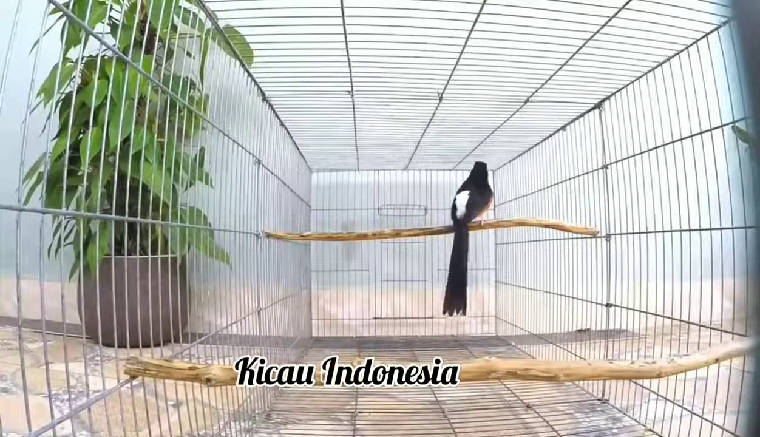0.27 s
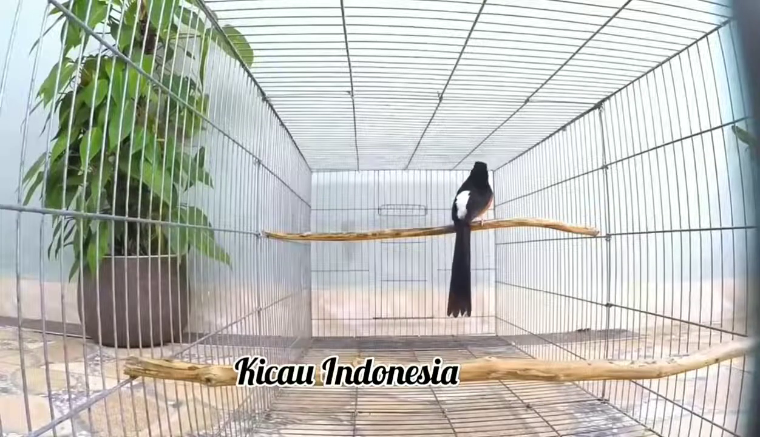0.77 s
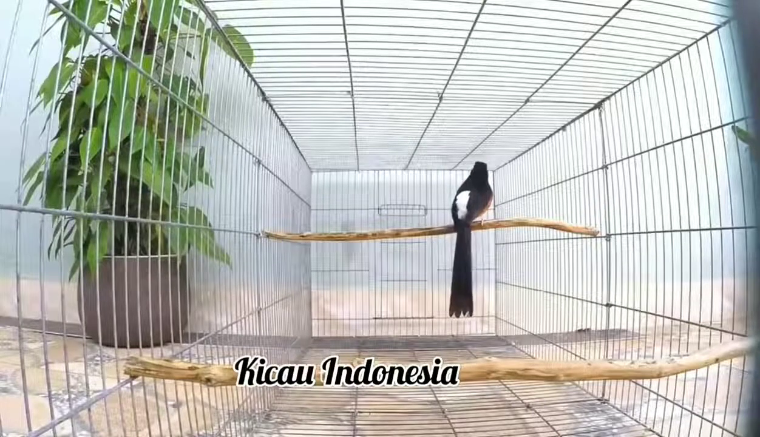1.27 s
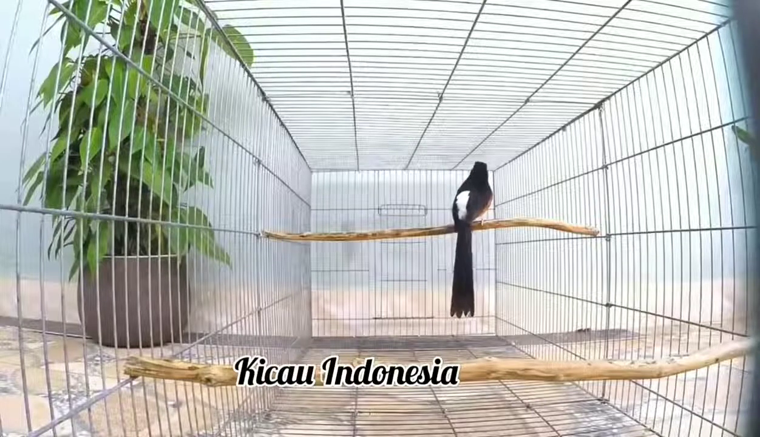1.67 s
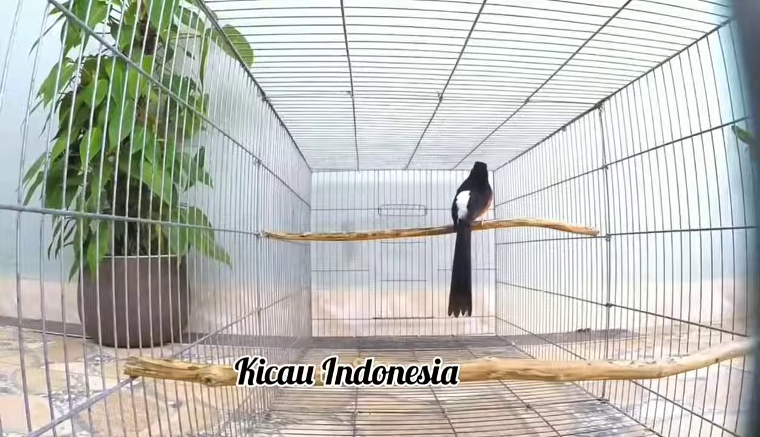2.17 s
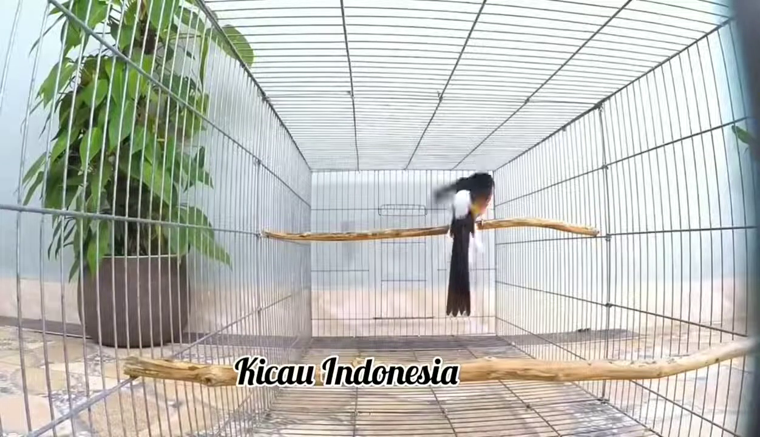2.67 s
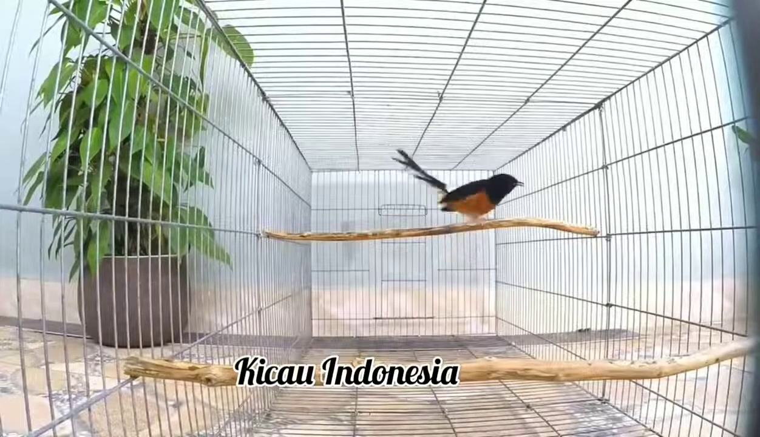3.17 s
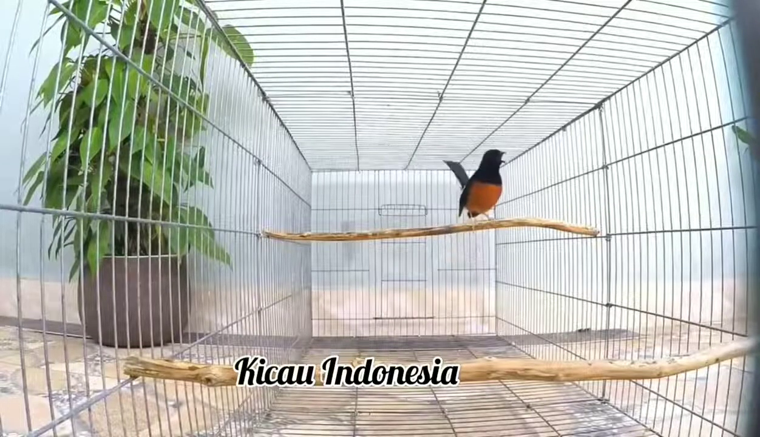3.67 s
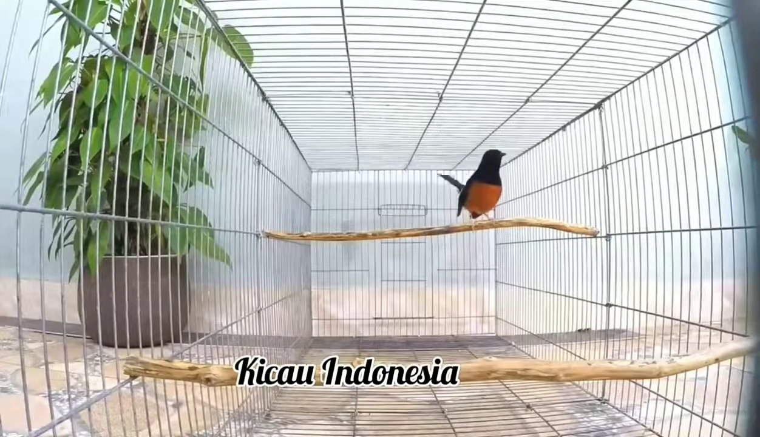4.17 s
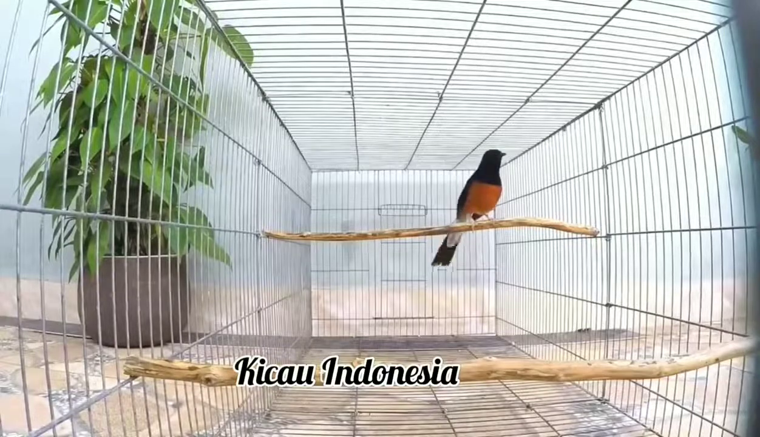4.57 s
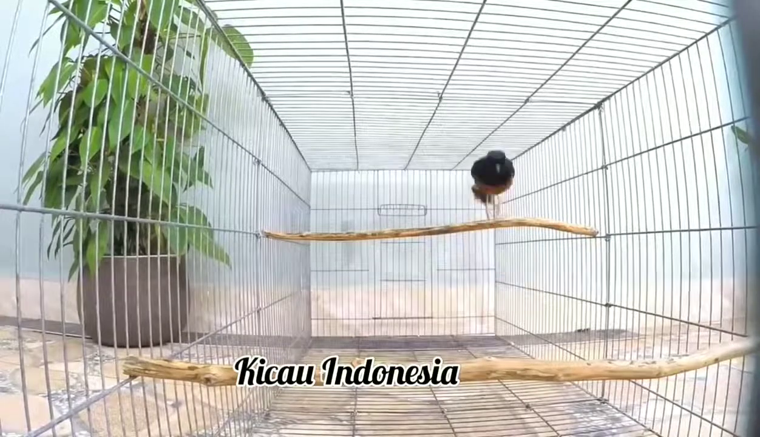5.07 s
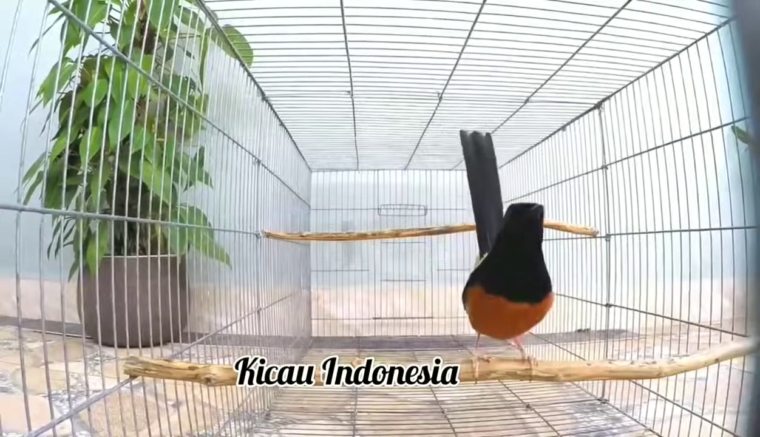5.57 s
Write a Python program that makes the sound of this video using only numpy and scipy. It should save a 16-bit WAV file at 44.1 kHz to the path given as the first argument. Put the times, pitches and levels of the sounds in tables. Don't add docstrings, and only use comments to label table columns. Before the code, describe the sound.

Close, piercing bird song bursts in an echoing yard, followed by clicking calls, distant answering birds and a final rattle with a loud whistle.

```python
import sys
import numpy as np
from scipy import signal
from scipy.fft import rfft, irfft, next_fast_len
from scipy.io import wavfile
from scipy.ndimage import uniform_filter1d, map_coordinates

SR = 44100
rng = np.random.default_rng(int(sys.argv[2]) if len(sys.argv) > 2 else 0)


def inscribe(sig):
    pcm = np.round(np.clip(np.atleast_2d(sig).T, -1, 1) * 32767)
    wavfile.write(sys.argv[1], SR, pcm.astype(np.int16))


def ratio(d):
    e = np.asarray(d, float) / 20
    return 10 ** e


N = 256220
T = np.arange(N) / SR

# [t/s, climb/s, hold/s, top f/Hz, level/dB]
RISES = [
    (.048, .077, .015, 2510, -3.5),
    (.215, .124, .009, 2620, -4),
]
# [share of the climb, level/dB]
RISE_EFFORT = [(0, -25), (.29, -1), (.6, 0), (.8, -3.5), (1, -1)]
# [t/s, f/Hz, level/dB]
WHISTLES = [
    [(1.51, 1470, -29), (1.525, 1495, -13), (1.546, 1445, -17.5)],
    [(1.668, 1940, -24), (1.686, 2210, -13.5), (1.699, 2150, -24.5), (1.712, 2180, -7.5),
     (1.724, 2214, -6.5)],
    [(3.789, 7350, -15.5), (3.806, 7510, -25), (3.822, 6000, -20), (3.84, 5210, -16.5), (3.875, 4550, -9),
     (3.929, 3620, -7)],
    [(5.643, 1760, -34), (5.662, 1900, -20), (5.671, 1840, -14), (5.68, 1790, -15), (5.694, 1825, 0),
     (5.719, 1870, 2), (5.7225, 1960, -12), (5.7255, 2030, -7), (5.731, 2120, -18)],
]
# [t/s, centre f/Hz, level/dB]
CLIMBS = [
    [(.426, 1500, -22), (.44, 1530, -12), (.466, 1720, -8.5), (.51, 1950, -9), (.54, 2150, -9.5),
     (.556, 2600, -5.5), (.584, 2680, -5.5)],
    [(.6, 1950, -12), (.625, 1680, -14), (.66, 1900, -12), (.69, 2300, -8), (.707, 2500, -9),
     (.716, 2720, -5.5), (.737, 2900, -5)],
    [(.829, 1700, -15), (.87, 1800, -14), (.93, 2050, -12.5), (.97, 2400, -11), (.985, 2680, -6.5),
     (1.025, 2720, -5.5), (1.036, 2720, -7)],
    [(1.045, 2300, -12), (1.095, 1700, -15), (1.13, 1950, -12), (1.163, 2250, -14), (1.178, 2720, -6),
     (1.22, 3334, -6.5), (1.24, 3440, -6)],
]
# [t/s, centre f/Hz, level/dB]
WARBLES = [
    [(1.355, 1700, -28), (1.371, 1660, -9.5), (1.41, 1640, -8.5), (1.432, 1665, -12)],
    [(1.725, 2340, -12), (1.77, 2300, -14), (1.83, 2200, -14.5), (1.85, 2150, -16)],
]
# [t/s, centre f/Hz, level/dB]
TRILLS = [
    [(1.55, 1570, -11.5), (1.62, 1600, -10), (1.68, 1600, -8.5)],
    [(1.847, 1294, -8.5), (1.87, 1200, -8), (1.93, 1215, -8.5), (1.952, 1210, -12.5), (1.975, 1205, -15),
     (2.012, 1195, -19)],
]
# [at the start f/Hz, at the end f/Hz]
WARBLE_SWING = [(250, 560), (250, 480), (320, 110), (290, 210), (120, 110), (250, 200)]
# [at the start f/Hz, at the end f/Hz]
TRILL_SWING = [(150, 125), (125, 85)]
# [t/s, ..]
CRESTS = [
    [.424, .438, .452, .466, .48, .499, .515, .532, .546, .56, .576, .588],
    [.602, .613, .625, .637, .649, .66, .673, .686, .7, .717, .729, .74],
    [.828, .84, .852, .865, .878, .894, .912, .93, .95, .968, .981, .99, .999, 1.008, 1.017, 1.026, 1.036],
    [1.044, 1.056, 1.068, 1.079, 1.09, 1.102, 1.112, 1.122, 1.138, 1.151, 1.167, 1.177, 1.187, 1.196, 1.205,
     1.213, 1.223, 1.233, 1.243],
    [1.349, 1.371, 1.392, 1.411, 1.433],
    [1.727, 1.753, 1.776, 1.798, 1.82, 1.843, 1.862],
]
# [t/s, ..]
STROKES = [
    [1.55, 1.574, 1.596, 1.618, 1.639, 1.658, 1.681],
    [1.847, 1.868, 1.896, 1.923, 1.951, 1.98, 2.013],
]
CREST_DIP_DB = [4.5, 5, 6, 5, 2, 2.5]
SWING_LATE = [5, 5, 1, 1, 1, 1]
# [multiple, level/dB]
OVERTONES = [(2, -43), (3, -46)]
WHISTLE_AIM = [1, 0.1, 3, 3.5, 2.5, 11.5]
WARBLE_AIM = [1, 0.5, 0, 1, 3.5, -1.5]
TRILL_AIM = [2, 1.5]
# [t/s, level/dB,
# length/s]
TACKS = [(2.609, -37, 0.002), (2.881, -20, 0.014), (3.0515, -15, 0.002), (3.054, -18, 0.009),
         (3.241, -13, 0.0024), (3.243, -22, 0.01), (3.32, -25, 0.0049), (3.326, -16.5, 0.007),
         (3.335, -21, 0.004), (3.5177, -13.5, 0.0028), (3.522, -16.5, .008), (5.172, -35.5, .004),
         (5.1805, -31, .005)]
# [f/Hz, level/dB per Hz]
BEAK = [(410, -40), (700, -18.5), (1400, -10), (2300, -12), (3370, -4), (3790, -10), (4610, -7),
        (8210, -27), (12600, -35.5), (16000, -51)]
# [f/Hz, level/dB per Hz]
RATTLE = [(240, -60), (400, -21), (520, -17.5), (994, -6.5), (1560, -12), (3530, -5.5), (5190, -13.5),
          (6740, -13.5), (16000, -37.5)]
# [peak t/s, level/dB, 20 dB rise/s, 20 dB fall/s, centre f/Hz, width f/Hz]
RASPS = [(1.157, -23, .008, .015, 1050, 110), (1.172, -25, .006, .015, 1050, 110),
         (1.188, -26, .006, .02, 1050, 110), (2.33, -48, .01, .2, 3500, 600),
         (2.72, -51, .05, .3, 4650, 350), (3.762, -34, .004, .08, 8600, 500),
         (3.785, -35, .04, .02, 8000, 700), (4.45, -39, .1, .15, 2150, 250),
         (4.45, -49, .03, .1, 4400, 200), (4.63, -45, .08, .1, 1550, 110), (4.65, -37, .06, .2, 2100, 300),
         (4.645, -45, .02, .2, 4350, 200), (4.645, -48, .02, .15, 5300, 200),
         (.03, -37, .15, .1, 4400, 900)]
# [peak t/s, level/dB, 20 dB rise/s, 20 dB fall/s]
CHATTER = [
    (2.7, -43.5, .01, .1),
    (2.82, -42, .1, .1),
    (4.22, -39.5, .11, .6),
    (4.45, -39, .1, .3),
    (4.65, -40, .03, .3),
    (4.986, -43, .06, .02),
    (5.026, -42, .015, .015),
    (5.228, -25.5, .1, .2),
    (5.348, -17, .05, .05),
]
# [peak t/s, level/dB, 20 dB rise/s, 20 dB fall/s]
RUSTLE = [
    (.01, -44, .1, .2),
    (4.446, -48, .05, .15),
    (4.558, -50, .1, .2),
    (4.642, -44, .025, .08),
    (4.79, -54, .15, .12),
    (5.172, -38.5, .003, .3),
    (5.37, -40, .08, .01),
]
# [f/Hz, level/dB per Hz]
WIRE = [(530, -51), (900, -33), (1190, -7), (2500, -12), (3260, -1), (4360, -9), (10600, -26), (16000, -45)]
# [t/s, length/s, from f/Hz, to f/Hz, peak level/dB]
ANSWERS = [
    (2.155, .14, 1880, 2620, -24.5),
    (2.545, .09, 2180, 2820, -24),
    (2.865, .11, 2280, 2930, -18.5),
    (3.17, .085, 2300, 2880, -14.5),
]
PEEPS = [
    (0, .03, 1820, 1830, -27),
    (3.55, .05, 5500, 5470, -41),
    (3.75, .06, 5800, 5900, -39),
    (3.885, .155, 1970, 1950, -31.5),
    (4.05, .04, 6200, 6150, -49),
    (2.96, .07, 2900, 2900, -28),
    (5.12, .04, 1824, 1806, -39),
    (4.41, .12, 2430, 2460, -40),
]
CHIRPS = [
    (1.146, .03, 1090, 1030, -25),
    (1.172, .028, 1060, 1020, -25),
    (4.305, .14, 3260, 3180, -33),
    (4.495, .07, 4050, 3950, -38),
    (4.57, .05, 3370, 3500, -41),
    (4.62, .06, 2114, 2330, -32),
    (4.785, .03, 4080, 4120, -36),
    (5.23, .05, 2220, 2160, -34),
    (4.44, .06, 2250, 2200, -33),
]
BURRS = [
    (0, .03, 5300, 3500, -30),
    (.785, .045, 1250, 1165, -26),
    (4.09, .12, 3850, 3050, -38),
    (4.17, .13, 3100, 2950, -40),
    (4.38, .08, 2000, 2200, -37),
    (4.69, .09, 3560, 3520, -38),
    (5.56, .075, 2900, 2950, -27),
    (5.635, .04, 3000, 2850, -30),
    (5.675, .025, 2950, 3200, -31),
    (5.708, .055, 3570, 3570, -23),
]
# [share of length before the peak, share of the glide done by then, onset level/dB, end level/dB]
CALL_SHAPES = [
    (.62, .88, -9, -5),
    (.5, .5, -4, -4),
    (.05, .05, -2, -16),
    (.55, .8, -5, -3),
]
CALL_ROUGH = [.018, .009, .025, .032]
# [f/Hz, 60 dB fall/s]
YARD = [(800, 0.28), (1200, .52), (2000, 0.8), (4500, 0.58), (7500, 0.42), (12000, 0.38)]
# [nearest t/s, drawing away/s, rumble level/dB,
# drone level/dB]
LORRIES = [
    (.05, .3, -27, -25),
    (.9, .15, -30, -35),
    (1.25, .15, -35, -36),
    (1.6, .2, -45, -29),
    (2.5, .25, -31, -30),
    (3.15, .25, -27, -33),
    (4.0, .5, -32, -31),
    (4.69, .1, -32, -27),
    (5.5, .075, -17.5, -42),
    (5.8, .15, -24, -42),
]
# [nearest t/s, drawing away/s, level/dB]
CARS = [
    (1.0, .2, -44),
    (2.33, .2, -37),
    (3.1, .4, -39.5),
    (5.02, .17, -37),
    (5.75, .25, -41),
]
# [f/Hz, level/dB per Hz]
STREET = [(110, -33.5), (190, -1), (392, -6), (498, -11.5), (709, -17.5), (903, -12.5), (1550, -14),
          (2750, -18), (3190, -14.5), (3430, -20), (5260, -27), (11000, -42), (16000, -58.5)]
# [f/Hz, level/dB]
MOTOR = [(323.0, -46), (403.7, -48.5), (484.5, -61), (570.6, -49.5), (646.0, -45.5), (732.1, -44.5),
         (812.9, -47), (974.4, -48.5)]
# [t/s, level/dB]
MOTOR_SWELL = [
    (3.0, -29),
    (3.3, 2),
    (3.45, 1),
    (3.7, -4),
    (3.85, -18),
]
# [t/s, firing f/Hz, throb level/dB, fifth multiple level/dB, growl level/dB]
ENGINE = [(0, 24.55, -29, -35, -30), (.2, 24.35, -31, -31, -31), (.36, 23.7, -32, -36, -36),
          (.62, 23.4, -34, -40, -36), (.95, 23.7, -27, -38, -35), (1.1, 23.85, -30, -38, -38),
          (1.53, 24.8, -34, -34, -34), (1.75, 25.1, -44, -35, -35), (1.9, 25.4, -47, -46, -36),
          (2.25, 26, -43, -42, -40), (2.6, 26.9, -44, -34, -43), (2.9, 25.5, -38, -41, -47),
          (3.2, 24.6, -37, -44, -45), (3.6, 27.3, -45, -37, -43), (4.2, 27.2, -45, -36, -47),
          (4.75, 27.2, -45, -36, -51), (5.1, 26, -48, -46, -52), (5.45, 24.4, -32, -41, -50)]
# [multiple of firing rate, level/dB]
ENGINE_ORDERS = [(1, -10), (3, -10), (4, -3), (6, 0), (7, -5.5), (8, -17), (9, -15), (10, -19), (11, -15),
                 (12, -15), (13, -21)]
# [f/Hz, level/dB]
MIC = [(20, 9), (1000, 2.5), (3000, -2.5), (5000, -0.5), (6500, -3), (7700, -2), (8000, -21), (8600, -27.5),
       (9000, -1.5), (10000, 1.5), (10900, -2), (12000, -12), (16000, -12)]
# [f/Hz, level/dB per Hz]
HAZE = [(2120, 8), (3600, -1.5), (4830, -5.5), (5570, -15.5), (6310, -14), (7610, -14.5), (8260, -45),
        (8950, -13), (10700, -10), (14800, -27), (16000, -24)]
# [f/Hz, level/dB per Hz]
SPLATTER = [(3500, -40), (4500, 0), (7700, 0), (8000, -25), (8700, -25), (9100, -2), (10500, -3),
            (12000, -8), (15800, -9), (16200, -50)]
# [f/Hz, level/dB]
TOP_COPY = [(8800, -70), (9200, -44), (10500, -39), (11500, -37), (13000, -34), (15000, -22), (15600, -28),
            (16000, -80)]


def near_bird():
    song = sing(rises() + WHISTLES, WHISTLE_AIM, edge=.003, rough=.003)
    song += sing(CLIMBS + WARBLES, WARBLE_AIM, edge=.003, rough=[.02] * 4 + [.005, .016],
                 swings=WARBLE_SWING, beats=CRESTS)
    song += sing(TRILLS, TRILL_AIM, edge=.002, rough=.006, swings=TRILL_SWING, beats=STROKES, chirped=True)
    return [filtered(row, lambda hz: 1 / (1 + (hz / 9800) ** 24)) for row in song]


def rises():
    from_hz, accent_db = 1045, 2
    notes = []
    for s, climb, hold, top_hz, db in RISES:
        note = [(s + u * climb, from_hz + u * (top_hz - from_hz), db + effort_db) for u, effort_db in RISE_EFFORT]
        notes.append(note + [(s + climb + hold, top_hz, db + accent_db)])
    return notes


def sing(notes, aim_db, edge, rough, swings=None, beats=None, chirped=False):
    song, unsteady, flutter = np.zeros((2, N)), wobble(150), wobble(90)
    for k, (rows, shake) in enumerate(zip(notes, np.broadcast_to(rough, len(notes)))):
        s, *cols = np.transpose(rows)
        span = slice(round(s[0] * SR), round(s[-1] * SR))
        t = T[span]
        hz, db = [np.interp(t, s, c) for c in cols]
        fade = np.clip(np.minimum(t - s[0], s[-1] - t) / edge, 0, 1)
        gain = ratio(db + 95 * shake * flutter[span]) * np.sqrt(2) * fade
        hz = hz * (1 + shake * unsteady[span])
        if swings:
            turn = np.interp(t, beats[k], np.arange(len(beats[k]))) % 1
            if chirped:
                late, wave = 1, 1 - 2 * turn
                swell = np.clip(turn / .1, 0, 1) * np.clip((.92 - turn) / .25, 0, 1) * ratio(-3.1 * turn)
            else:
                late, wave = SWING_LATE[k], 1 - 2 * np.sin(np.pi * turn) ** 1.25
                swell = ratio(-CREST_DIP_DB[k] * (wave + .3))
            start_hz, end_hz = swings[k]
            hz = hz + (start_hz + (end_hz - start_hz) * np.linspace(0, 1, len(t)) ** late) * wave
            gain = gain * swell
        phase = 2 * np.pi * np.cumsum(hz) / SR
        overtones = sum(ratio(level) * np.sin(order * phase) for order, level in OVERTONES)
        tone = gain * (np.sin(phase) + overtones)
        song[:, span] += tone * ratio([[0], [-aim_db[k]]])
    return song


def tacks():
    count = np.floor(np.cumsum(950 * ratio(3 * wobble(600))) / SR)
    clicks = np.diff(count, prepend=0) * ratio(2 * rng.standard_normal(N))
    source = .7 * unit(clicks) + rng.standard_normal(N)
    gate = np.zeros(N)
    for s, db, length in TACKS + rattle():
        gate += ratio(db + 1.5 - 5 * np.clip(T - s, 0, 1) / length) * ((T >= s) & (T < s + length))

    def coloured(x, colour):
        late_s = 0.000514
        return filtered(x, lambda hz: ratio(along(colour, hz)) * np.exp(-2j * np.pi * hz * late_s))

    parts = [(BEAK, T < 5.3), (RATTLE, T >= 5.3)]
    return sum(coloured(source * gate * when, colour) / np.std(coloured(source, colour)) for colour, when in parts)


def rattle():
    start_s, gap_s, slows_s, tack_s = 5.385, .0061, .00023, .004
    level_db, fade_db = -10, 3.7
    return [(start_s + k * gap_s + k * k * slows_s, level_db - fade_db * max(k - 4, 0), tack_s) for k in range(8)]


def rasps():
    grain = ratio(2.5 * wobble(120))
    return sum(bursts([row[:4]]) * hump(*row[4:]) for row in RASPS) * grain


def neighbours():
    notes, rough = [], []
    for rows, shape, kind_rough in zip([ANSWERS, PEEPS, CHIRPS, BURRS], CALL_SHAPES, CALL_ROUGH):
        peak, bend, onset_db, end_db = shape
        for s, length, a, b, db in rows:
            top = (s + peak * length, a + bend * (b - a), db)
            notes.append([(s, a, db + onset_db), top, (s + length, b, db + end_db)])
            rough.append(kind_rough)
    return sing(notes, np.zeros(len(notes)), edge=.014, rough=rough)[0]


def chatter():
    voice = unit(hump(3240, 550) * ratio(wobble(40)))
    rustle = filtered(rng.standard_normal(N) * ratio(1.3 * wobble(260)), lambda hz: ratio(along(WIRE, hz)))
    return bursts(CHATTER) * voice + ratio(8) * bursts(RUSTLE) * unit(rustle)


def yard(x, delay):
    hz, t, z = signal.stft(rng.standard_normal(SR), SR, nperseg=256)
    hz = hz[:, None]
    shape_db = -60 * t / along(YARD, hz) + 6 * np.exp(-t / 0.021)
    shape_db = shape_db - 5 * (t > .115) * np.clip(hz / 2400, 0, 1) ** 2 - 1.5 * (hz < 1700)
    tail = signal.istft(z / np.abs(z) ** .6 * ratio(shape_db), SR, nperseg=256)[1]
    return signal.fftconvolve(np.pad(x, (round(delay * SR), 0)), tail / np.linalg.norm(tail))[:N]


def background():
    s, away_s, rumble_db, drone_db = np.transpose(LORRIES)
    rumble = passing(zip(s, away_s, rumble_db), far_db=-36) * ratio(-4.5 + 0.69 * wobble(2)) * hump(55.8, 31.2)
    drone = passing(zip(s, away_s, drone_db), far_db=-41) * ratio(-9.5 + 1.2 * wobble(5.24)) * hump(137, 33.8)
    cars = passing(CARS, far_db=-57)
    street = filtered(rng.standard_normal(N), lambda hz: ratio(along(STREET, hz)))
    street_gain = np.hypot(ratio(-48), ratio(-6.5) * cars)
    hiss = street_gain * ratio(3.5 + 0.78 * wobble(8)) * unit(street)
    tyres = cars * ratio(-2 + wobble(12)) * unit(hump(561.6, 25) + 1.47 * hump(716, 190))
    motor = tones(MOTOR, MOTOR_SWELL, unsteady_db=3.5)
    return ratio(-48) * hump(95, 18) + rumble + drone + hiss + tyres + motor + engine()


def passing(rows, far_db):
    near = sum((ratio(db) / (1 + ((T - s) / away_s) ** 2)) ** 2 for s, away_s, db in rows)
    return np.sqrt(ratio(far_db) ** 2 + near)


def engine():
    hz, throb_db, fifth_db, growl_db = curves(ENGINE)
    turn = 2 * np.pi * np.cumsum(hz) / SR
    growl = sum(ratio(db + 2 * wobble(3)) * np.sin(order * turn + rng.uniform(0, 6.1)) for order, db in ENGINE_ORDERS)
    throb = ratio(throb_db) * np.sin(2 * turn)
    fifth = ratio(fifth_db + 2.5 * wobble(4)) * np.sin(5 * turn)
    return np.sqrt(2) * (throb + fifth + ratio(growl_db) * growl)


def tones(lines, swell, unsteady_db):
    waves = np.zeros(N)
    for hz, db in lines:
        waves += ratio(db + 1 + unsteady_db * wobble(7)) * np.sin(2 * np.pi * hz * T + rng.uniform(0, 6.1))
    return waves * ratio(curves(swell)[0])


def bursts(rows):
    return sum(ratio(db - 20 * np.where(T < s, (s - T) / rise_s, (T - s) / fall_s)) for s, db, rise_s, fall_s in rows)


def hump(centre_hz, width_hz):
    return unit(filtered(rng.standard_normal(N), lambda hz: np.exp(-((hz - centre_hz) / width_hz) ** 2)))


def filtered(x, response):
    m = next_fast_len(N + SR // 2)
    return irfft(rfft(x, m) * response(np.fft.rfftfreq(m, 1 / SR)), m)[:N]


def wobble(rate):
    return map_coordinates(rng.standard_normal(int(N * rate / SR) + 4), [T * rate])


def curves(rows):
    s, *cols = np.transpose(rows)
    return [np.interp(T, s, c) for c in cols]


def along(points, hz):
    f, v = np.transpose(points)
    return np.interp(np.log(hz + 1), np.log(f + 1), v)


def unit(x):
    return x / np.sqrt(np.mean(x ** 2) + 1e-20)


def scene():
    direct, to_walls = near_bird()
    calls, hops, far = tacks(), chatter(), neighbours()
    calls_to_walls = calls * ratio(np.where(T < 5.3, -7, -12))
    near = direct + ratio(-4.0) * yard(to_walls, delay=.004) + calls + yard(calls_to_walls, delay=.006)
    far_echo = yard(far + ratio(-4.5) * hops, delay=0.0048)
    distant = ratio(-9.5) * far + ratio(-3.5) * far_echo + ratio(-5.5) * hops
    return (near + distant + background() + rasps())[None]


def top_octave(x):
    shift_hz = 7600
    moved = np.real(signal.hilbert(x, next_fast_len(N))[:N] * np.exp(2j * np.pi * shift_hz * T))
    return filtered(moved * ratio(3 * wobble(500)), lambda hz: ratio(along(TOP_COPY, hz)))


def capsule_buzz(x, drive, uneven):
    def haze(y):
        return unit(filtered(y, lambda hz: ratio(along(HAZE, hz)) * (hz > 3600)))

    noise = haze(rng.standard_normal(N) * ratio(0.68 * wobble(330)))
    kink = np.abs(x) / (drive + 0.0092)
    folded = haze(kink + np.tanh(3 * x / (drive + .01)))
    return uneven * noise + 0.3 * filtered(folded, lambda hz: hz < 8000)


def low_pass(x):
    return signal.sosfilt(signal.butter(12, 16000, fs=SR, output="sos"), x)


def record(dry):
    x = dry[0]
    drive = np.sqrt(np.abs(uniform_filter1d(x ** 2, size=600)))
    quick = np.sqrt(np.abs(uniform_filter1d(x ** 2, size=90)))
    beat = np.abs(quick / (drive + 1e-3) - 1)
    uneven = np.clip(5 * uniform_filter1d(beat, size=400), .1, 1)
    buzz = capsule_buzz(x, drive, uneven)
    clipped = x / (1 + np.abs(x) ** 16) ** (1 / 16)
    heard = x + filtered(clipped - x, lambda hz: ratio(along(MIC, hz))) + ratio(-35) * drive ** 1.08 * buzz
    excess = np.abs(uniform_filter1d(np.clip(np.abs(x) - .7, 0, .25), size=70)) ** .6
    splatter = unit(filtered(rng.standard_normal(N), lambda hz: ratio(along(SPLATTER, hz))))
    preamp_hiss = ratio(-73) * hump(13000, 2000)
    heard = heard + ratio(-23.5) * uneven * excess * splatter + top_octave(clipped) + preamp_hiss
    return low_pass(np.clip(heard, -1, 1)[None])


dry = scene()
out = record(dry)
inscribe(out)
```